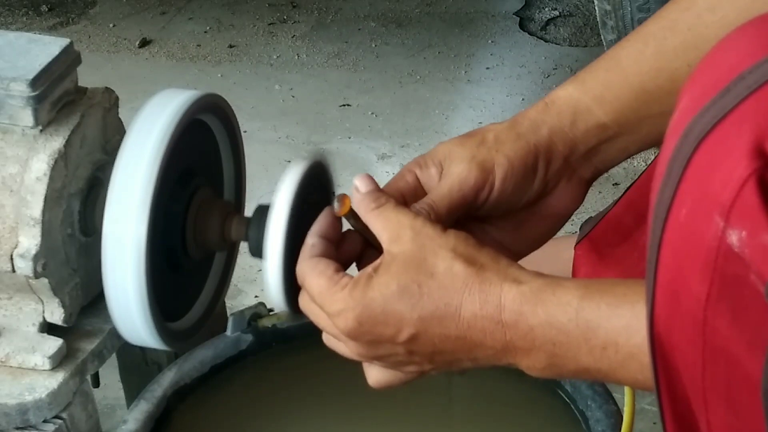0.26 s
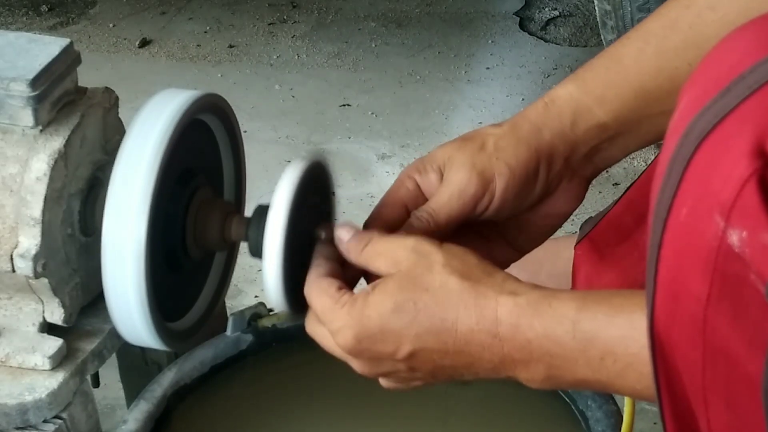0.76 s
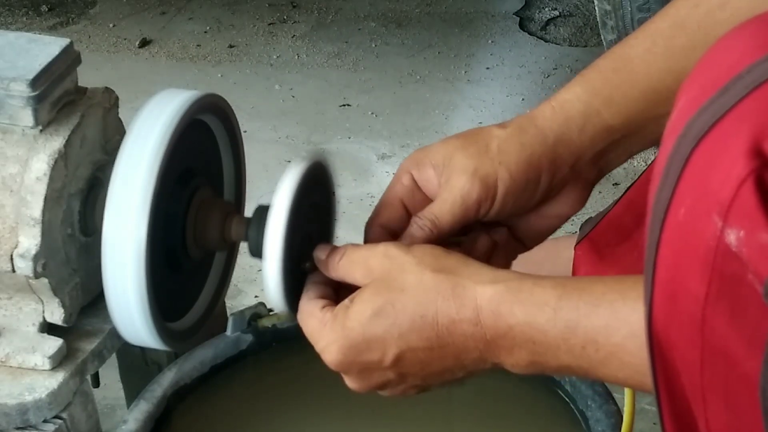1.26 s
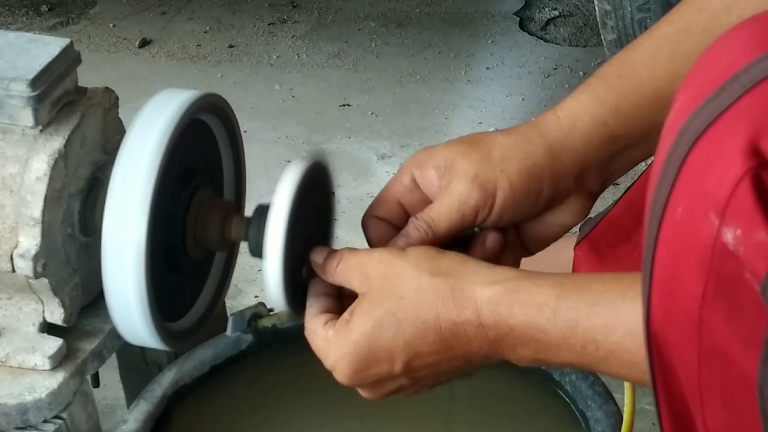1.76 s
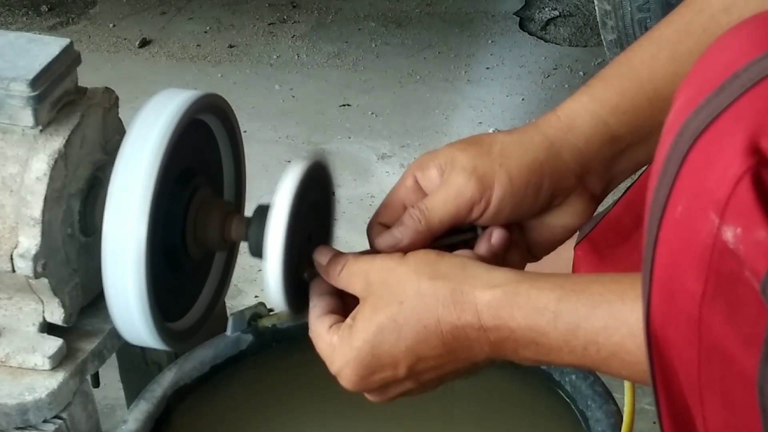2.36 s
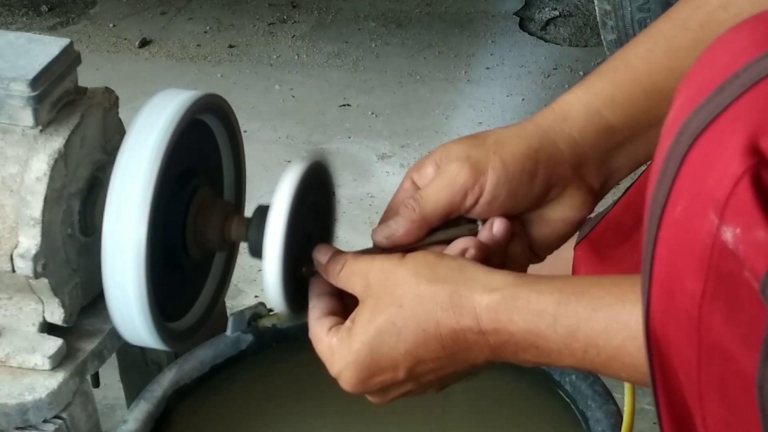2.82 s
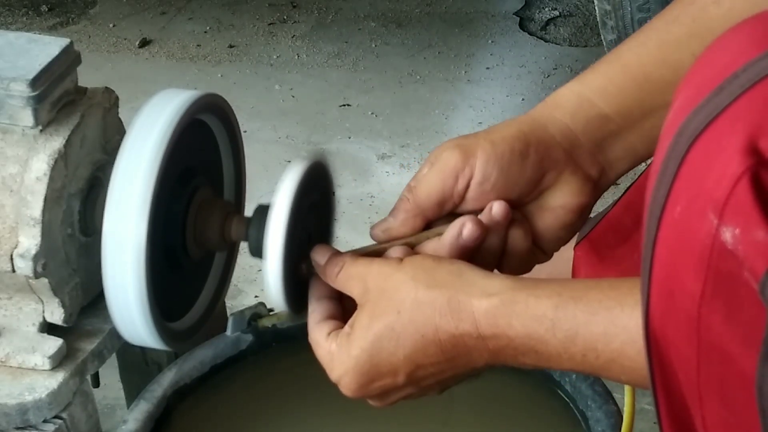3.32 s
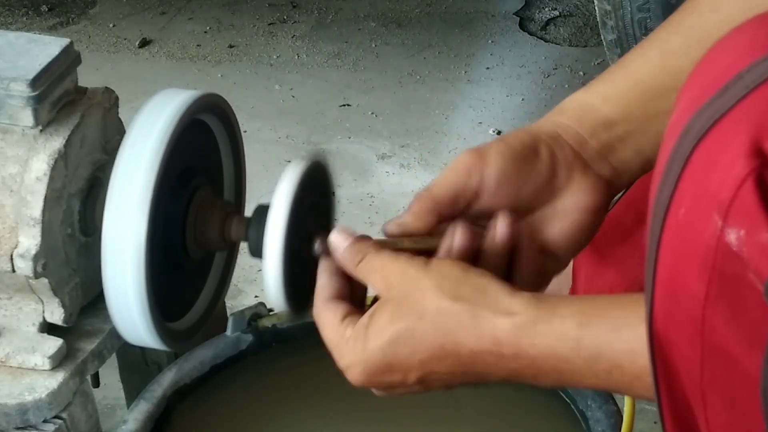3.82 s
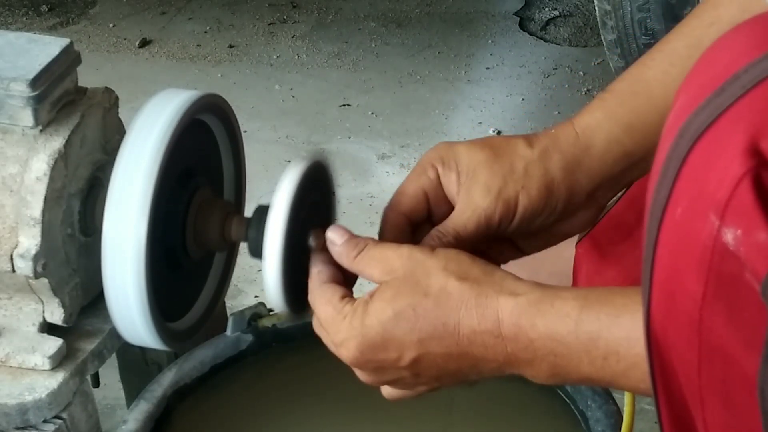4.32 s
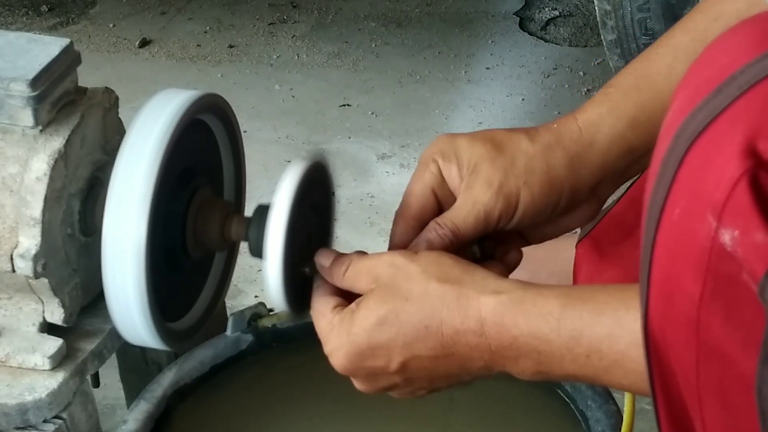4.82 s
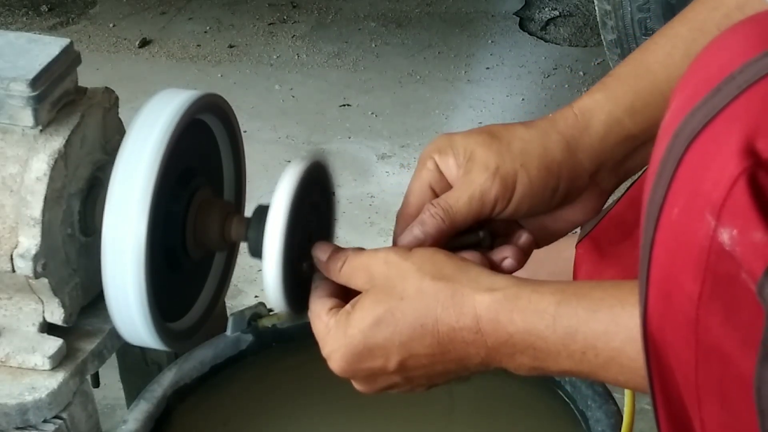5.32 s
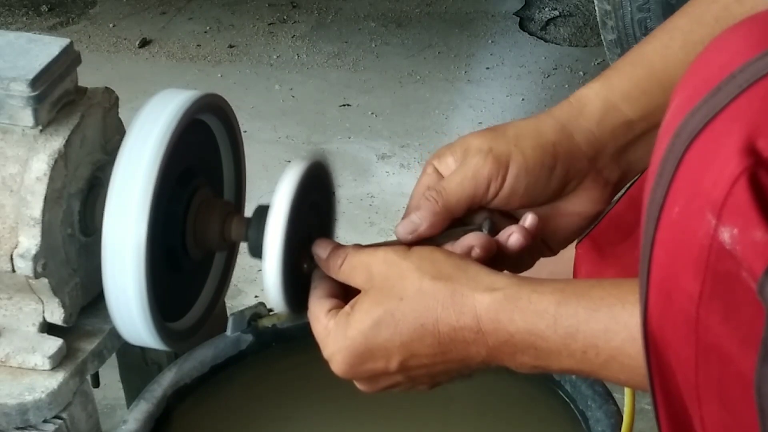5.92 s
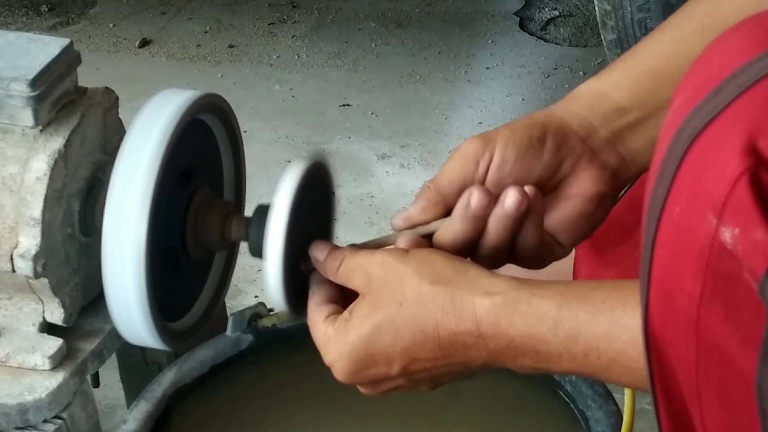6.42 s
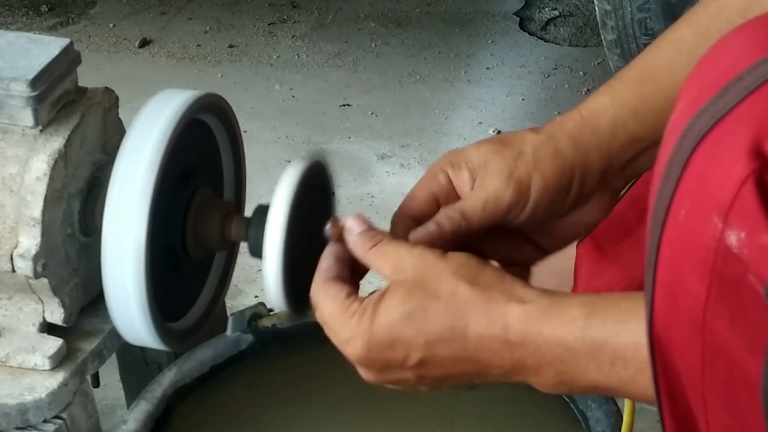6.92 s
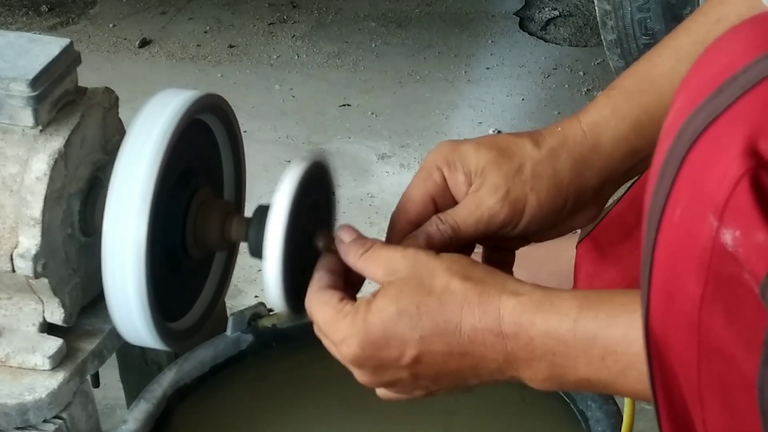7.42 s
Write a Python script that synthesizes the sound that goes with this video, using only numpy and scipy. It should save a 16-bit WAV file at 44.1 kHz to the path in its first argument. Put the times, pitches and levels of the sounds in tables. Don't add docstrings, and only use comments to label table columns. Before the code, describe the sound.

A bench grinder runs continuously close to a stereo microphone in a hard workshop: a nearly constant nasal whine, rough bearing roar and metallic housing ring. A small stone is held against the spinning wheel in two long spells, adding a thin pulsing scrape and gritty hiss that swells as fingers press harder, then eases between them. Mains hum, a low drone and a faint far engine sit beneath.

```python
import sys
import numpy as np
from scipy import signal
from scipy.fft import rfft, irfft, next_fast_len
from scipy.io import wavfile
from scipy.ndimage import uniform_filter1d, map_coordinates

SR = 44100
rng = np.random.default_rng(int(sys.argv[2]) if len(sys.argv) > 2 else 0)


def gain_from_db(level_db):
    decades = np.asarray(level_db, float) / 20
    return 10 ** decades


def unload_wav(signal):
    wavfile.write(
        sys.argv[1],
        SR,
        np.round(np.clip(np.atleast_2d(signal).T, -1, 1) * 32767).astype(np.int16),
    )


N = 338229
t = np.arange(N) / SR

WHINE_HZ, SHAFT_HZ, OUTER_HZ, INNER_HZ = 760, 48.83, 200.95, 236.95
# (time [s], pitch [Hz])
SPEED = [(0.0, 759.6), (.55, 761), (1.35, 761.4), (1.75, 761), (2.35, 758.9), (2.9, 758.4), (3.75, 757.7),
         (4.35, 760.5), (4.7, 761.2), (5.3, 760.9), (5.9, 759.4), (6.9, 759), (7.3, 760.5), (7.67, 761.2)]
# (time [s], shift to the inner race [dB], shake [dB])
LOAD = [(0, -1.5, -1), (.5, -1.5, 2), (.8, -2, -2), (1.35, -1.5, 2), (1.65, -2, -0.5), (2.1, -2, 1),
        (2.72, 2, 1), (3.05, 2, 1.5), (3.5, 2.5, 2.5), (3.85, 2.5, 2), (4.3, -4, -1.5), (4.88, 0.5, 2.5),
        (5.4, -1, 0.5), (6.1, 1, 2.5), (6.4, 1, 0.5), (6.75, 1, 0), (7.25, -0.5, 0.5), (7.67, -2.5, -2)]
# (frequency [Hz], left [dB], right [dB], left lead [rad])
WHINE = [(761, -40, -43, 0.0065)]
# (multiple of shaft rate, left [dB], right [dB], left lead [rad])
SHAFT = [(5, -65, -65, -0.3), (6, -64, -67, 0.4), (7, -59, -65, 0.4), (8, -63, -64, 0.4),
         (10, -51, -61, 1.0), (11, -52, -56, 1.2), (12, -48, -52, 1.4), (13, -48, -53, 1.5),
         (14, -55, -59, 1.7), (20, -50, -62, 0.1), (35, -64, -66, -2.2), (65, -56, -60, 2.6),
         (66, -53, -50, 2.9), (67, -53, -55, 2.7), (68, -59, -57, 2.9)]
# (multiple of ball-pass rate, left [dB], right [dB], left lead [rad])
OUTER = [(2, -60, -56, 0.8), (4, -50, -51, 2.2), (5, -43, -48, -1.3), (6, -48, -54, 0.8),
         (7, -52, -56, -0.4), (8, -58, -59, -2.9), (9, -67, -63, -1.7), (10, -65, -66, -3.0),
         (11, -63, -63, 2.7), (12, -64, -68, 2.5), (14, -62, -68, 3.1), (15, -65, -62, 3.0),
         (17, -63, -62, 3.1), (18, -60, -60, 3.1), (24, -84, -68, -0.3), (25, -84, -68, 0.3)]
# (multiple of ball-pass rate, left [dB], right [dB], left lead [rad])
INNER = [(1, -73, -72, -0.2), (2, -58, -60, 0.8), (3, -57, -57, 2.0), (4, -41, -41, 0.9),
         (5, -48, -50, 0.5)]
# (frequency [Hz], left [dB], right [dB], left lead [rad])
SIDEBANDS = [(353, -64, -73, 0.4), (425, -59, -66, 0.4), (451, -53, -57, 1.0), (459, -57, -64, 0.9),
             (523, -67, -55, 1.2), (554, -59, -65, 1.2), (662, -56, -72, 0.2), (723.5, -52, -54, 1.8),
             (741, -53, -59, 2.3), (784, -58, -54, -2.5), (822.5, -55, -56, -0.7), (904, -48, -59, 1.8),
             (918.5, -44, -50, 2.2), (1072, -63, -57, -0.7), (1090, -64, -61, -0.4), (1226, -61, -61, 3.0),
             (1316, -63, -71, 0.2), (1386, -63, -61, 0.0), (1510, -69, -61, -0.7), (1590, -58, -58, -1.1),
             (1626, -54, -61, -1.4), (1791, -60, -54, 1.9), (1827, -52, -54, 0.9), (1993, -63, -68, -3.0),
             (2025, -62, -66, 2.9), (3162, -56, -59, 2.5), (3871, -66, -65, 3.1), (4528, -75, -66, -1.3),
             (1443, -62, -62, -0.4), (855, -56, -58, 0.6)]
# (time [s], level [dB])
WHINE_LEVEL = [(0.0, -44), (0.58, -44), (2.18, -43.5), (2.33, -53), (2.37, -43), (2.48, -51), (2.52, -44),
               (3.65, -47), (4.93, -41.5), (4.95, -45.5), (6.99, -46.5), (7.05, -42.5), (7.61, -47),
               (7.67, -51)]
# (time [s], level [dB])
INNER_LEVEL = [(0.0, -46.5), (0.6, -43.5), (0.62, -47), (1.28, -48.5), (1.32, -43.5), (1.64, -50),
               (1.73, -46), (3.91, -42), (4.18, -49), (6.17, -43.5), (6.19, -46.5), (6.9, -45), (7.63, -49),
               (7.67, -53)]
# (time [s], level [dB])
OUTER_LEVEL = [(0.0, -46), (0.51, -46), (0.81, -54), (1.26, -45.5), (2.11, -50.5), (2.88, -46), (2.97, -52),
               (3.14, -46.5), (3.2, -57.5), (3.31, -49.5), (4.38, -52), (4.64, -45), (6.22, -50),
               (6.39, -62), (6.75, -40), (6.88, -54), (7.2, -46), (7.67, -55.5)]
# (time [s], level [dB])
CAGE_LEVEL = [(0.0, -61.5), (0.43, -51), (0.68, -62), (0.83, -54), (2.24, -58.5), (2.45, -52.5),
              (2.58, -60.5), (2.88, -53), (3.25, -60.5), (3.33, -53.5), (5.6, -59.5), (5.64, -50.5),
              (6.02, -53), (6.26, -64.5), (6.73, -51.5), (6.92, -65), (6.99, -59), (7.67, -54.5)]
# (time [s], level [dB])
ORDER_12_LEVEL = [(0.0, -52), (0.1, -48), (0.72, -56.5), (1.47, -49), (1.62, -68.5), (1.71, -48.5),
                  (2.29, -61.5), (2.39, -48), (3.33, -62.5), (3.52, -48), (3.65, -61), (3.84, -46.5),
                  (4.42, -57), (5.6, -50), (6.39, -59), (7.37, -48.5), (7.54, -57), (7.67, -61)]
# (time [s], level [dB])
ORDER_13_LEVEL = [(0.0, -55.5), (0.15, -65), (0.3, -53), (2.54, -59.5), (2.6, -52.5), (3.52, -62.5),
                  (5.28, -53.5), (5.34, -68), (5.38, -55), (5.77, -63), (5.81, -50.5), (6.09, -59),
                  (6.26, -54), (6.45, -63), (6.56, -55), (7.67, -55.5)]
# (frequency [Hz], left [dB/Hz], right [dB/Hz], likeness [0-1], left lead [rad])
BODY = [(20, -103, -103, .85, 1.5), (72, -96.5, -96.5, 0.8, 0.2), (113, -81, -81.5, 0.98, 0),
        (180, -87.5, -90, .7, 0.7), (322, -80.5, -86, .6, 0.5), (430, -72.5, -73, 1, 0.7),
        (633, -70, -79, 0.4, 1.75), (756, -77, -64.5, 0.26, 2.5), (897, -74, -74.5, 0.4, 1.4),
        (926, -66.5, -66.5, .9, 1), (958, -65.5, -76, 1, 0.5), (993, -66.5, -74, 1, -1),
        (1048, -77.5, -74.5, 0.8, -0.2), (1350, -79, -80, 0.3, 0.1), (1440, -79.5, -77.5, 0.7, -1.2),
        (1675, -74, -79.5, 0.3, -1.5), (1784, -72, -68, 0.65, -4), (1938, -76.5, -80.5, 0.6, -3.5),
        (2290, -120, -120, 0.7, -3)]
# (frequency [Hz], left [dB/Hz], right [dB/Hz], likeness [0-1], left lead [rad])
BALLS = [(1860, -120, -120, 1, -6.5), (2034, -79.5, -80, 0.71, -2.5), (2590, -83, -89.5, 0.82, -4.5),
         (3010, -81, -78.5, 0.71, -3.5), (3640, -80.5, -85.5, 0.99, -2.5), (3970, -75.5, -76, 0.92, -3),
         (3874, -90.5, -73, 0.13, -5), (4940, -94, -87.5, 0.11, -3), (5300, -96.5, -85.5, .1, 1),
         (6120, -93.5, -84.5, .1, -3.5), (6820, -99, -89, .1, 5.5), (8010, -107, -100.5, .1, -3.5),
         (7710, -114, -106, .1, 3), (8100, -140, -140, .1, 1.5)]
# (frequency [Hz], width [Hz], left [dB rms], right [dB rms], likeness [0-1], left lead [rad])
BELLS = [(3243, 82, -49, -46.5, 0.93, 2.8), (4290, 170, -62, -49.5, 0.5, -2.5),
         (6050, 80, -67, -50, 0.45, -0.9), (6237, 140, -66, -52.5, 0.4, -0.5)]
# (time [s], half length [s], gain [dB])
PEALS = [(0.287, 0.093, 3.5), (0.535, 0.099, 8.5), (0.893, 0.069, 8), (1.247, 0.067, 8.5),
         (1.39, 0.053, 3.5), (1.785, 0.18, 6.5), (2.55, 0.068, 0.5), (3.597, 0.22, -1), (3.98, 0.07, 3.5),
         (4.623, 0.036, 8), (4.89, 0.053, 8.5), (5.248, .08, 2), (5.476, .05, 2.5), (6.1, 0.12, 3),
         (6.554, 0.071, 3), (7.117, 0.13, 3), (7.298, 0.045, -2)]
# (frequency [Hz], left [dB/Hz], right [dB/Hz], likeness [0-1], left lead [rad])
SCRAPE = [(2020, -120, -120, 0.44, -11), (2227, -82.5, -85, 0.92, -2), (3940, -87, -87.5, 0.39, -3),
          (4020, -92, -76.5, 0.45, 7), (4800, -95, -74, 0.51, -1.5), (5230, -90.5, -78, 0.49, -3),
          (5700, -93.5, -83, 0.28, 1.5), (6840, -101, -85.5, .3, 0), (7800, -100, -86.5, 0.43, 7),
          (7810, -104, -90.5, .2, -5.5), (8900, -125, -125, .2, 4.5)]
# (frequency [Hz], left [dB/Hz], right [dB/Hz], likeness [0-1], left lead [rad])
GRIT = [(8200, -140, -140, .1, 1.5), (8100, -106, -110, .1, 1), (8800, -104, -106, .1, -1),
        (9150, -109, -104, .2, 2), (10400, -106, -101, 0.48, -1), (11640, -107, -102, .3, 2),
        (12400, -107, -105, .5, 5.5), (13300, -108, -107, .4, 3), (14300, -112, -112, .1, 5)]
# (start [s], end [s], grit level [dB])
HELD = [
    (1.32, 3.89, -82.5),
    (4.894, 6.95, -79.5),
]
# (time [s],
# half length [s], scrape level [dB], grit level [dB])
PRESS = [(0, 0.006, -62, -64), (1.395, 0.052, -58, -76.5), (1.85, 0.16, -65, -88), (2.157, 0.088, -63, -78),
         (2.66, 0.018, -60, -80.5), (3.716, .05, -63, -76), (3.774, 0.013, -54, -77.5),
         (2.48, 0.21, -54, -72), (2.648, 0.04, -53, -77.5), (2.769, 0.15, -50, -70.5),
         (3.08, 0.09, -66, -76), (3.277, 0.026, -55.5, -81), (3.459, 0.23, -54, -77),
         (3.807, 0.053, -51, -70), (5.04, 0.035, -57, -74.5), (5.11, 0.023, -54.5, -77),
         (5.42, 0.099, -72, -85), (5.949, 0.12, -55, -77.5), (6.18, 0.15, -61, -75.5),
         (6.384, 0.07, -55, -70.5), (6.696, 0.08, -63, -80.5)]
# (time [s], firing rate [Hz], engine level [dB], drone level [dB])
ENGINE = [(0, 79, -61.5, -54), (.35, 81, -61, -54.5), (.7, 84, -62, -56), (.95, 85.8, -63, -72),
          (1.5, 88.5, -63.5, -74), (2.2, 91.86, -62.5, -77), (3, 97, -76, -65), (3.5, 98, -78, -60),
          (4.15, 98.5, -77, -66.5), (4.4, 97.87, -81, -55.5), (5, 99, -74, -60.5), (5.4, 99, -78, -66),
          (5.8, 99, -75, -60), (6.3, 99, -80, -64), (7.67, 98.88, -86, -63.5)]
# (frequency [Hz], left [dB], right [dB], left lead [rad])
MAINS = [(100.1, -64, -63.5, 0.041), (149.7, -69, -68.5, 0.062), (198.3, -70, -70.5, 0.024),
         (248.9, -59.5, -60, -0.3), (297.3, -71.5, -68, .3)]
# (time [s], level [dB])
HUM_LEVEL = [(0.0, -64.5), (0.19, -63), (0.21, -71.5), (0.28, -61), (1.26, -68), (3.54, -66), (3.67, -62),
             (3.91, -68.5), (5.19, -61), (5.42, -75.5), (5.51, -63), (6.0, -61), (6.41, -73.5),
             (6.53, -61.5), (7.52, -62), (7.67, -71.5)]
# (from [Hz], to [Hz], share of frames lost [0-1])
DROPPED = [(1980, 2070, .1), (2070, 2150, .34), (2150, 2240, .34), (2240, 2330, .55), (2330, 2410, .3),
           (2410, 2500, .3), (2500, 2580, .14), (2580, 2670, .18), (2670, 2760, .15), (2760, 2840, .18),
           (2840, 2930, .45), (2930, 3020, .2), (3020, 3100, .06)]
# (time [s], length [s])
SPARE = [(.83, .04), (.91, .03), (1.21, .03), (1.28, .03), (1.35, .03), (1.4, .03), (1.94, .06),
         (2.14, .03), (3.81, .06), (4, .03), (4.55, .08), (4.79, .08), (4.99, .1), (5.57, .08), (5.83, .03),
         (5.9, .02), (6.07, .04), (6.88, .03), (7.19, .04), (7.46, .02), (7.54, .02), (7.62, .04)]
# (time [s], length [s], from [Hz], to [Hz])
GAPS = [(1.19, .03, 3100, 3445), (2.64, .08, 3100, 3445), (5.44, .06, 3100, 3445), (2.88, .09, 2070, 2330),
        (3.3, .11, 2070, 2240), (3.43, .06, 2150, 2240), (3.56, .14, 1980, 2070), (3.1, .08, 2840, 3020),
        (3.27, .06, 2840, 3020), (6.1, .16, 2240, 2330), (6.29, .05, 2070, 2240), (6.59, .07, 2240, 2500)]
# (from [Hz], to [Hz], share of frames lost [0-1], worth per treble level [1/dB])
TOPS = [(7580, 7900, .25, .1), (7900, 8150, .65, .12), (8960, 9300, .45, .04), (9300, 9650, .3, .04),
        (11700, 12400, .22, .05), (12400, 12750, .5, .06), (12750, 13090, .72, .15),
        (13090, 13460, .82, .2), (13460, 22050, 1, 0)]
# (from [Hz], to [Hz], left share lost [0-1], right share lost [0-1])
NOTCH = [(8150, 8270, .97, .98), (8270, 8610, .88, .99), (8610, 8960, .88, .99)]
# (frequency [Hz], level [dB])
FAINT = [(4600, -110), (4800, -86), (5500, -86), (5900, -92), (6600, -88), (7300, -89), (8150, -95),
         (8160, -130)]


def grinder(clock):
    shift_db, shake_db = [c - c.mean() for c in curves(LOAD)]
    pan_db = -.44 * shift_db + .2 * shake_db + .73 * wobble(4.8)
    bell_db = bumps(*np.transpose(PEALS))
    bell_db = bell_db - bell_db.mean()
    x = bearing_tones(clock, shift_db, shake_db) + shaft_tones(clock) + rattle(clock)
    x *= gain_from_db(.5 * np.array([pan_db, -pan_db]))
    x += gain_from_db(1.3 * bell_db) * tones(SHAFT[-4:], SHAFT_HZ * clock, flutter_db=2.5, rate=12, slip=.9)
    x += ball_noise(clock, bell_db) + housing_bells(clock, bell_db)
    load_db = .49 * shake_db + .35 * wobble(11) + .6 * wobble(20)
    return gain_from_db(load_db) * x


def bearing_tones(clock, shift_db, shake_db):
    whine_db = -.99 * shift_db + .35 * shake_db + 1.5 * wobble(6.4)
    inner_db = .55 * shift_db + .39 * shake_db + .29 * wobble(7)
    outer_db = .55 * shake_db + 3.7 * wobble(5)
    creep = np.cumsum(wobble(.589)) / SR
    outer_cycles = OUTER_HZ * clock + .05 * creep
    whine_led = {761: .5 * swing(WHINE_LEVEL)}
    inner_led = {4: .5 * swing(INNER_LEVEL) - .5 * inner_db}
    outer_led = {5: swing(OUTER_LEVEL) - .59 * outer_db}
    cage_led = {hz: swing(CAGE_LEVEL) for hz in (1791, 1827)}
    x = gain_from_db(whine_db) * tones(WHINE, clock, flutter_db=1.1, rate=6.2, slip=.064, sway=.5, led=whine_led)
    x += gain_from_db(inner_db) * tones(INNER, INNER_HZ * clock, flutter_db=0, rate=6, slip=.23, led=inner_led)
    x += gain_from_db(.64 * outer_db) * tones(OUTER, outer_cycles, flutter_db=2, rate=6, slip=.49, sway=.4, led=outer_led)
    return x + tones(SIDEBANDS, clock, flutter_db=1, rate=3.01, slip=.41, led=cage_led)


def shaft_tones(clock):
    cycles = SHAFT_HZ * clock
    led = {12: swing(ORDER_12_LEVEL), 13: swing(ORDER_13_LEVEL)}
    low = tones(SHAFT[:2], cycles, flutter_db=1, rate=3, slip=.3)
    return low + tones(SHAFT[2:-4], cycles, flutter_db=3, rate=4, slip=.59, led=led)


def rattle(clock):
    chatter = throb(SHAFT_HZ * clock, [.8, .6, .5, .5, 1.2]) * gain_from_db(1.8 * wobble(70) - .4)
    return chatter * gain_from_db(.3 * wobble(5)) * rush(BODY, patchy_db=1.3)


def ball_noise(clock, bell_db):
    balls = throb(OUTER_HZ * clock, [.9, .6])
    return gain_from_db(.11 * bell_db + .34 * wobble(4.9)) * balls * rush(BALLS, patchy_db=2)


def housing_bells(clock, bell_db):
    x = np.zeros((2, N))
    for row, swell_db in zip(BELLS, [bell_db, .31 * bell_db, 0, 0]):
        hz, width_hz, left_db, right_db, alike, lead = row

        def shape(f):
            return np.sqrt(SR / (np.pi * width_hz)) / np.abs(1 + (2 * (f - hz) / width_hz) ** 2)

        ring = pair(lambda f: gain_from_db(left_db) * shape(f), lambda f: gain_from_db(right_db) * shape(f),
                    lambda f: alike, lambda f: lead, patchy_db=.5)
        x += gain_from_db(swell_db + 2.1 * wobble(6.4)) * throb(SHAFT_HZ * clock, [.8, .7]) * ring
    return x


def stone(clock):
    land_s, spray_db = .05, -86
    s, half_s, scrape_db, grit_db = np.transpose(PRESS)
    rim = throb(SHAFT_HZ * clock, [1.6, 1.3, .9, .8, 1, 1.1])
    held = sum(gain_from_db(2 * db) * np.clip(np.minimum(t - a, b - t) / land_s, 0, 1) for a, b, db in HELD)
    tremor = gain_from_db(.7 * wobble(22) + 1.2 * wobble(90))
    pressed = np.sqrt(bumps(s, half_s, gain_from_db(2 * scrape_db)) + gain_from_db(35.5) * held) * tremor
    grit = np.sqrt(bumps(s, half_s, gain_from_db(2 * grit_db)) + held + gain_from_db(2 * spray_db)) * tremor
    scrape = pressed * gain_from_db(52) * rush(SCRAPE, patchy_db=1.5)
    hiss = grit * gain_from_db(75.5) * rush(GRIT, patchy_db=1)
    return rim * (scrape + hiss)


def workshop():
    firing_hz, engine_db, drone_db = curves(ENGINE)
    orders = [(1, -7, -7.5, 0), (4 / 3, 0, 0, 0), (5 / 3, -3, -3, 0), (7 / 3, -9, -9, 0)]
    engine = gain_from_db(engine_db) * tones(orders, np.cumsum(firing_hz) / SR, flutter_db=2.2, rate=5, slip=.4)
    drone_hz = 132.8
    drone = gain_from_db(drone_db) * tones([(1, 0, 0, 0)], drone_hz * t, flutter_db=1.5, rate=4, slip=.4)
    hum = tones(MAINS, t, flutter_db=1.5, rate=3, slip=.4, led={MAINS[0][0]: swing(HUM_LEVEL)})
    return engine + drone + hum


def tones(rows, cycles, flutter_db, rate, slip, led={}, sway=0):
    out = np.zeros((2, N))
    for k, left_db, right_db, lead in rows:
        phase = 2 * np.pi * (k * cycles + rng.random()) + slip * wobble(rate)
        free_db = flutter_db * (.53 if k in led else 1)
        flutter = wobble(rate, lambda v: gain_from_db(free_db * v - free_db ** 2 / 9))
        level = np.sqrt(2) * gain_from_db(led.get(k, 0)) * flutter
        if sway:
            lead = lead + sway * wobble(1.5)
        out += level * np.array([gain_from_db(left_db) * np.sin(phase + lead), gain_from_db(right_db) * np.sin(phase)])
    return out


def rush(rows, patchy_db):
    f, left_db, right_db, alike, lead = np.transpose(rows)

    def read(column):
        return lambda hz: np.interp(np.log(hz + 1), np.log(f + 1), column)

    def gain(column_db):
        return lambda hz: gain_from_db(read(column_db)(hz)) * np.sqrt(SR / 2)

    return pair(gain(left_db), gain(right_db), read(alike), read(lead), patchy_db)


def pair(left, right, alike, lead, patchy_db):
    z = signal.stft(rng.standard_normal((2, N + 999)), nperseg=512)[2]
    field = uniform_filter1d(rng.standard_normal(z.shape[1:]), size=4, axis=0)
    field = uniform_filter1d(field, size=10, axis=1)
    gain = gain_from_db(patchy_db * field / field.std())
    noise = signal.istft(z * gain / np.sqrt(np.mean(gain ** 2)), nperseg=512)[1]
    a, b = rfft(noise, next_fast_len(N + 2048))
    hz = np.linspace(0, SR / 2, len(a))
    share = np.clip(alike(hz), 0, 1)
    left_port = left(hz) * a * np.exp(1j * lead(hz))
    right_port = right(hz) * (share * a + np.sqrt(1 - share ** 2) * b)
    return irfft([left_port, right_port])[:, :N]


def throb(turns, depths_db):
    gain = gain_from_db(sum(d * np.sin(2 * np.pi * ((k + 1) * turns + rng.random())) for k, d in enumerate(depths_db)))
    return gain / np.sqrt(np.mean(gain ** 2))


def swing(rows):
    db = 1.23 * curves(rows)[0]
    return db - 10 * np.log10(np.mean(gain_from_db(2 * db)))


def bumps(s, half_s, height):
    return sum(h * np.exp(-((t - a) / max(w, .005)) ** 2) for a, w, h in zip(s, half_s, height))


def wobble(rate, shape=lambda v: v):
    grid = np.arange(0, N + 64, 64) / SR
    knots = rng.standard_normal(int(N * rate / SR) + 4)
    return np.interp(t, grid, shape(map_coordinates(knots, [grid * rate])))


def curves(rows):
    s, *cols = np.transpose(rows)
    return [np.interp(t, s, c) for c in cols]


def scene():
    clock = np.cumsum(curves(SPEED)[0] / WHINE_HZ) / SR
    return grinder(clock) + stone(clock) + workshop()


def best(worth, share):
    return worth > np.quantile(worth, share)


def thin_mid(z, hz, when, treble_db):
    for lo_hz, hi_hz, share in DROPPED:
        band = (hz > lo_hz) & (hz < hi_hz)
        mid, side = uniform_filter1d(np.sum(np.abs(z[:, band]) ** 2, axis=1), size=3, axis=1)
        z[0, band] *= best(mid / side * gain_from_db(-.3 * treble_db), share)
    spared = sum(np.abs(when - s) < max(long_s / 2, .012) for s, long_s in SPARE)
    lucky = np.repeat(rng.random((3, len(when))) > .3, 6, axis=0)[1:]
    z[0, (hz > 3445) & (hz < 3790)] *= spared * lucky > 0
    for s, long_s, lo_hz, hi_hz in GAPS:
        z[0, (hz > lo_hz) & (hz < hi_hz)] *= np.abs(when - s) > max(long_s / 2, .012)


def thin_treble(z, hz, when, treble_db):
    for lo_hz, hi_hz, share, busy in TOPS:
        worth = uniform_filter1d(rng.standard_normal(len(when)), size=3) + busy * treble_db
        z[:, (hz > lo_hz) & (hz <= hi_hz)] *= best(worth, share)
    ports = np.array([z[0] + z[1], z[0] - z[1]]) / 2
    for lo_hz, hi_hz, *shares in NOTCH:
        worth = rng.standard_normal((2, len(when))) + .12 * treble_db
        kept = np.array([best(w, q) for w, q in zip(worth, shares)])
        ports[:, (hz > lo_hz) & (hz <= hi_hz)] *= kept[:, None]
    return ports


def thin_faint(ports, hz, when):
    sparse, hush_db, mood_db = 1.9, -107, 2.8
    cells = uniform_filter1d(np.abs(ports) ** 2, size=3, axis=1)
    faint_db = np.interp(hz, *np.transpose(FAINT), left=-200)
    power = np.sum(np.abs(ports) ** 2, axis=0)
    local = uniform_filter1d(uniform_filter1d(power, size=40, axis=0), size=3, axis=1)
    mood = rng.standard_normal((len(hz) // 16 + 1, len(when)))
    mood = np.repeat(mood, 16, axis=0)[:len(hz)]
    floor = np.maximum(sparse * local, gain_from_db(2 * hush_db)) * gain_from_db(2 * mood_db * mood)
    peaks = (hz[:, None] < 8150) | (power > floor)
    return ports * peaks * (cells > gain_from_db(2 * faint_db[:, None]))


def band_limit(x):
    return signal.sosfilt(signal.butter(12, 13460, fs=SR, output="sos"), x)


def record(dry):
    frame = dict(fs=SR, window="cosine", nperseg=2048)
    hz, when, z = signal.stft([dry[0] + dry[1], dry[0] - dry[1]], boundary="even", **frame)
    treble = np.mean(np.abs(z[:, hz > 9200]) ** 2, axis=(0, 1))
    treble_db = 10 * np.log10(uniform_filter1d(treble, size=9) + 1e-20)
    thin_mid(z, hz, when, treble_db)
    ports = thin_treble(z, hz, when, treble_db)
    ports = thin_faint(ports, hz, when)
    fade = np.clip((t[-1] - t) / .003, .3, 1)
    mix = signal.istft(ports, **frame)[1][:, :N] * fade
    return band_limit(mix)


dry = scene()
out = record(dry)
unload_wav(out)
```